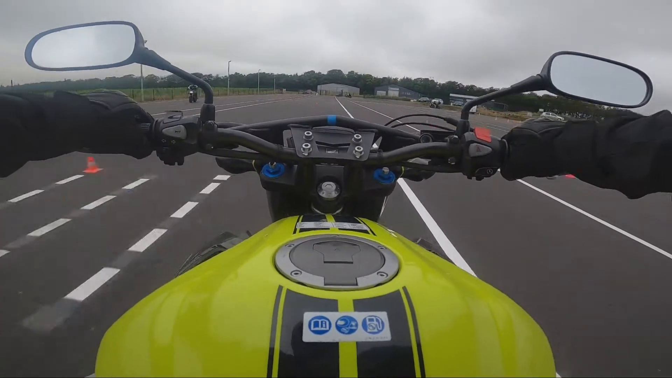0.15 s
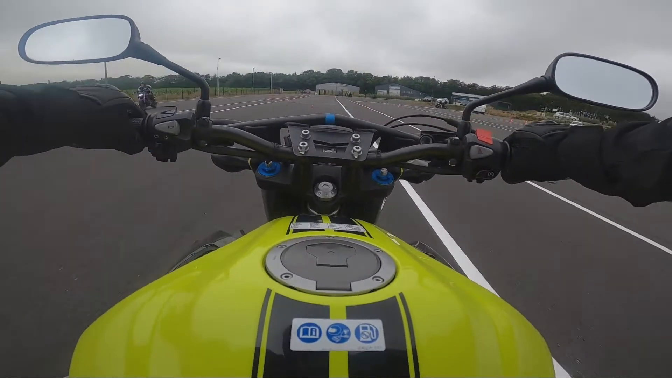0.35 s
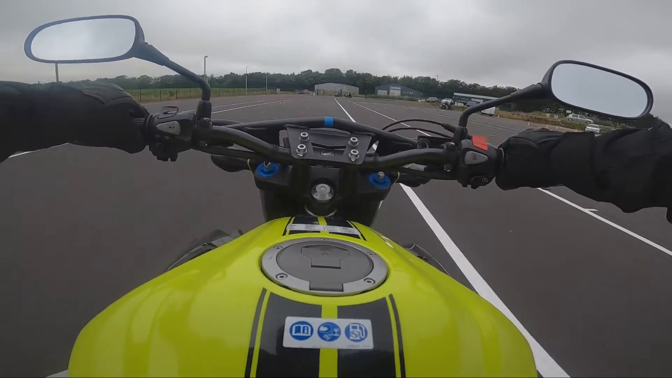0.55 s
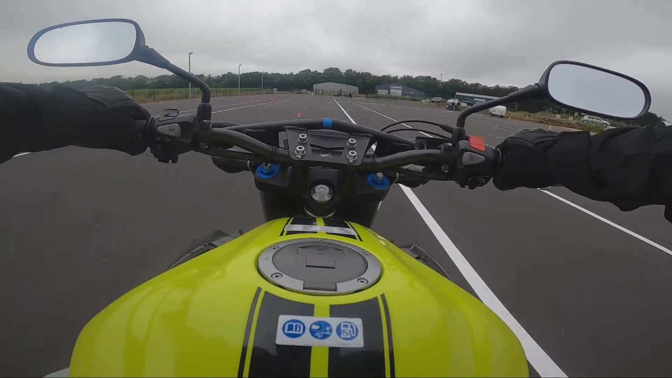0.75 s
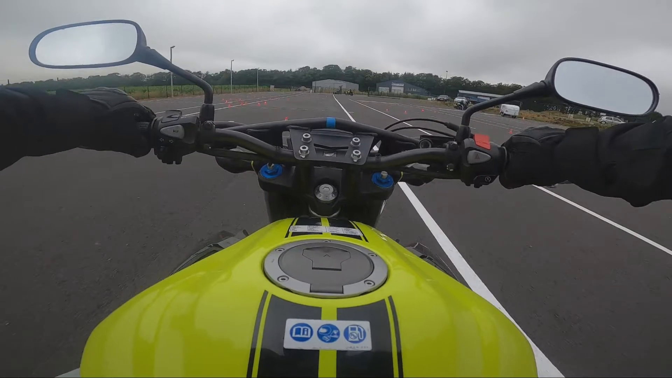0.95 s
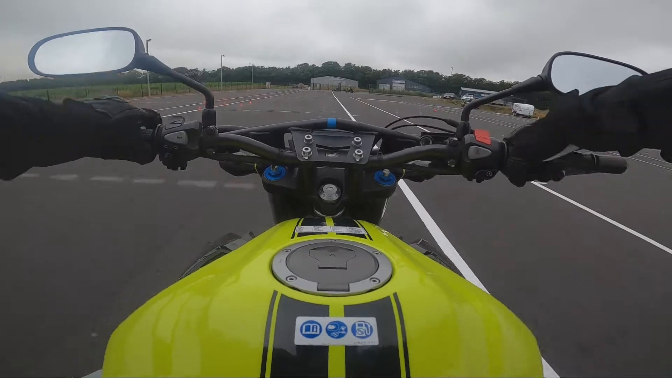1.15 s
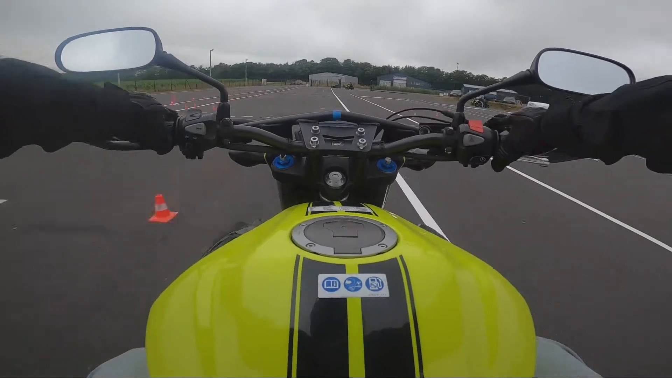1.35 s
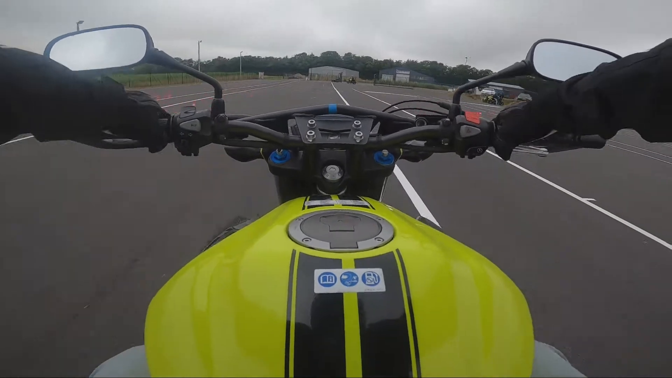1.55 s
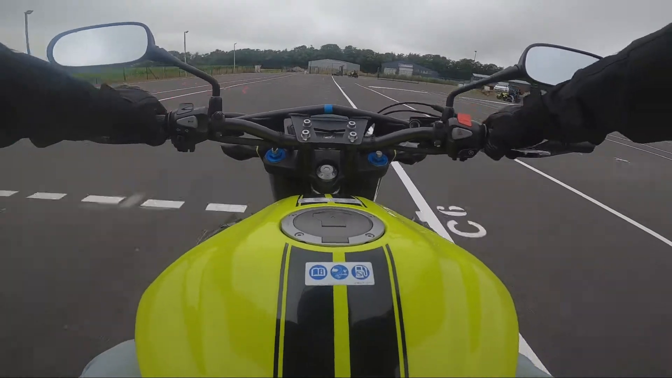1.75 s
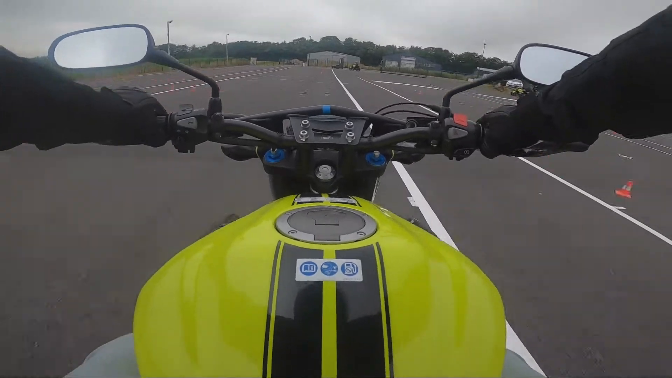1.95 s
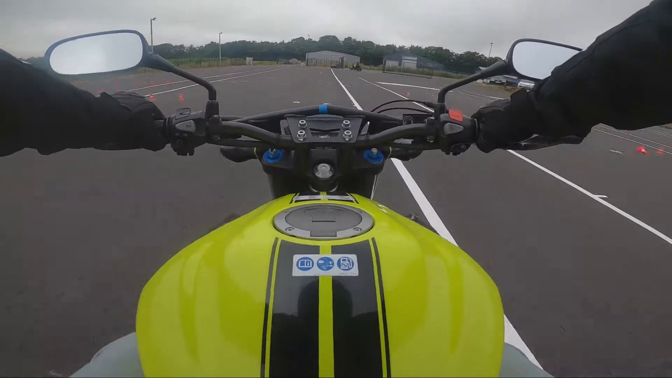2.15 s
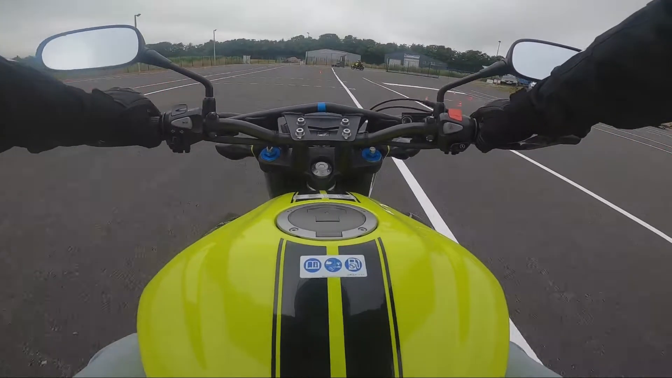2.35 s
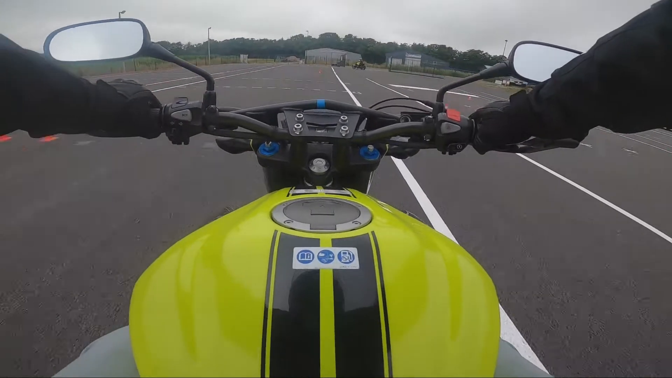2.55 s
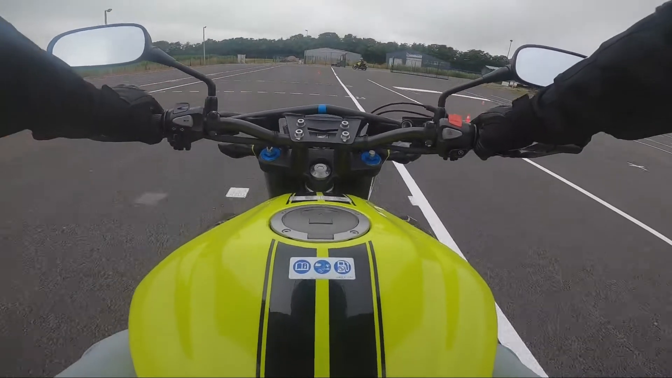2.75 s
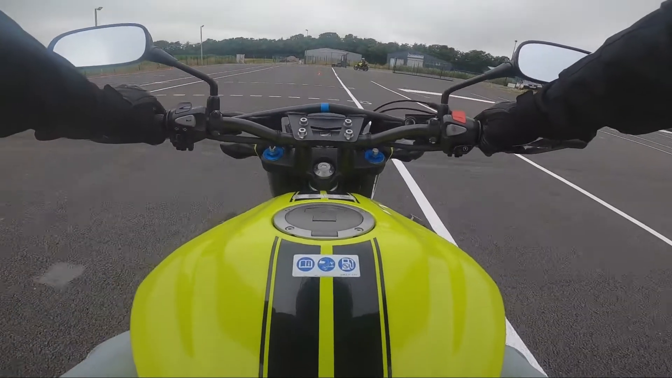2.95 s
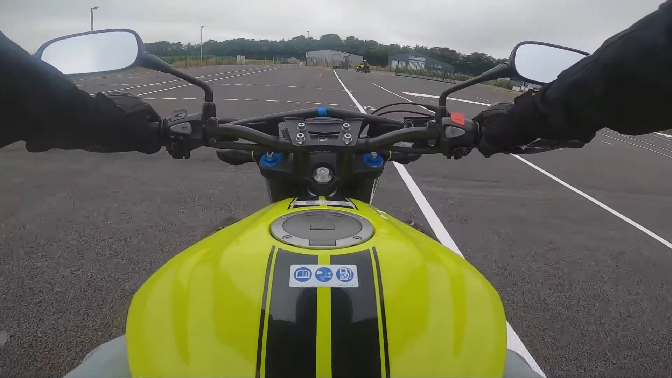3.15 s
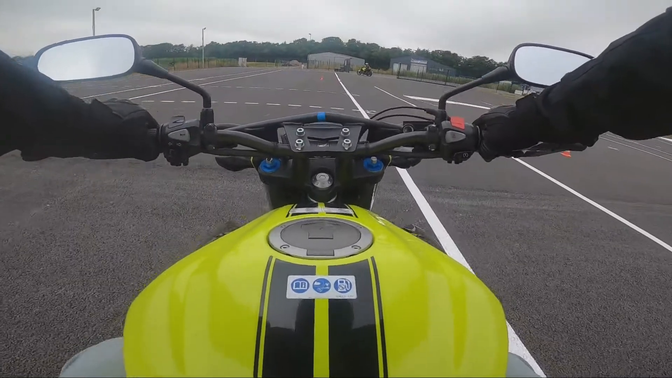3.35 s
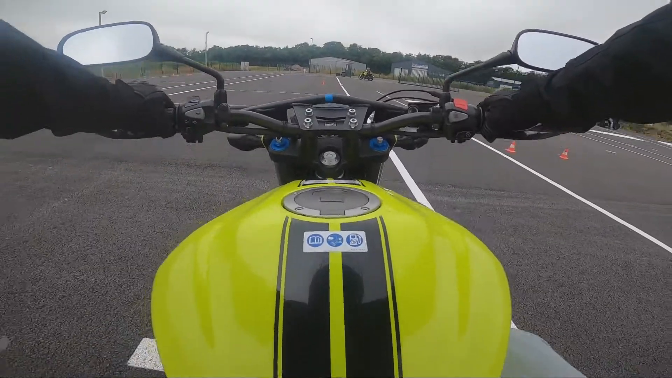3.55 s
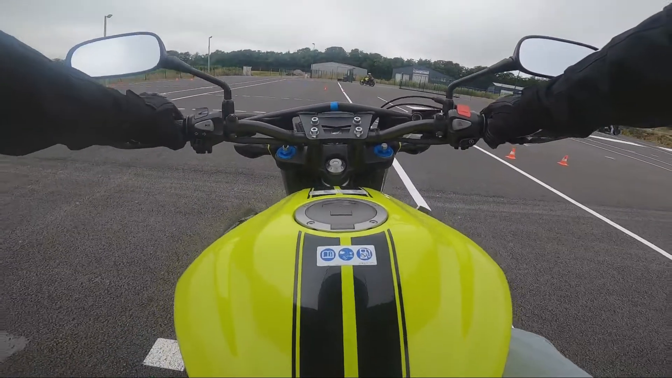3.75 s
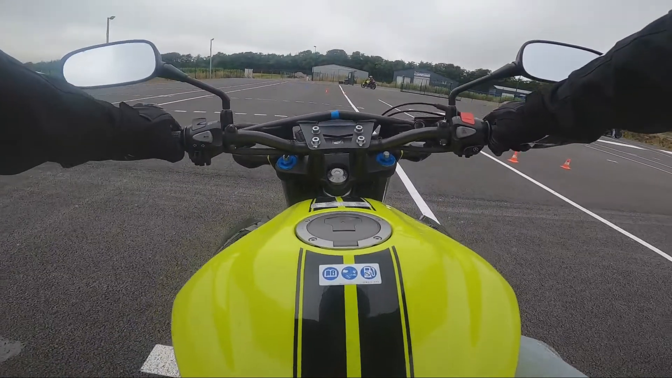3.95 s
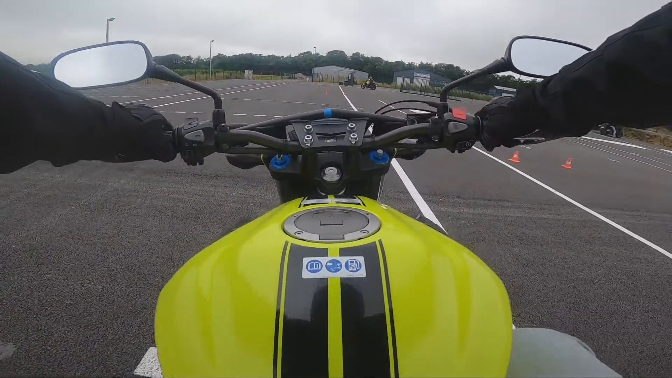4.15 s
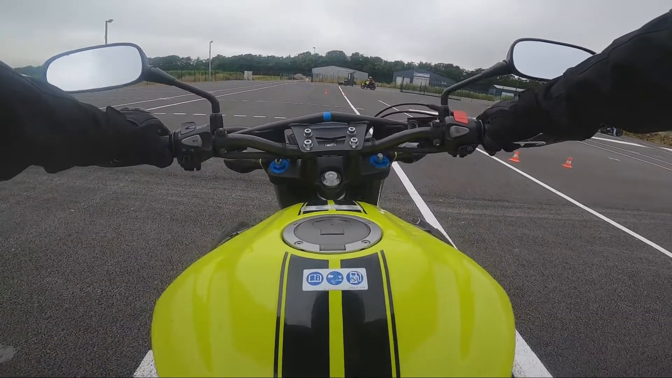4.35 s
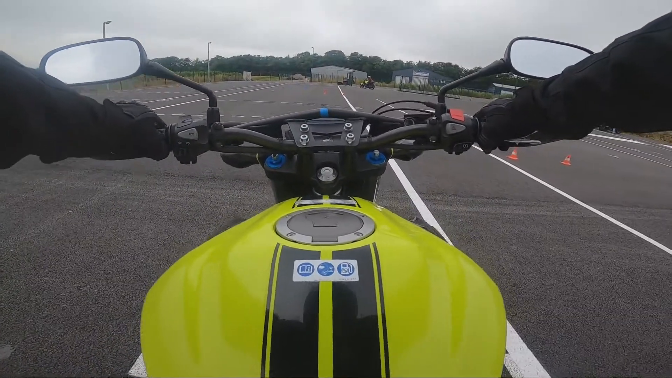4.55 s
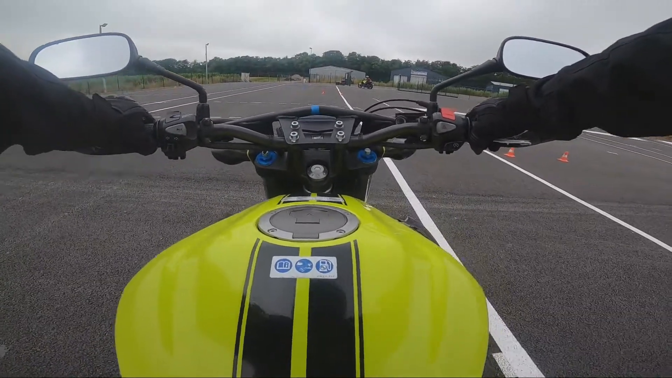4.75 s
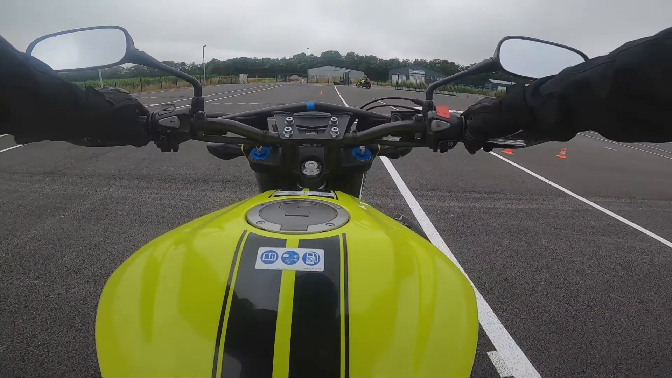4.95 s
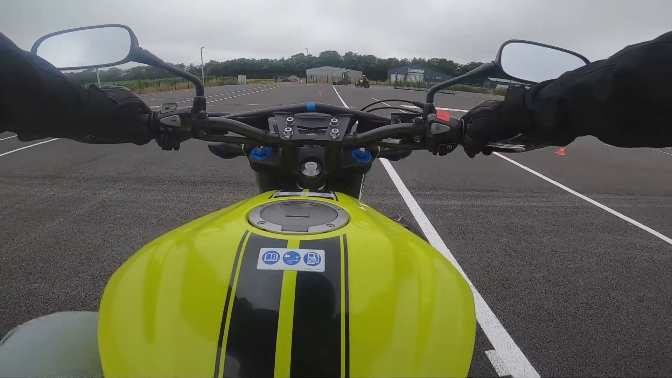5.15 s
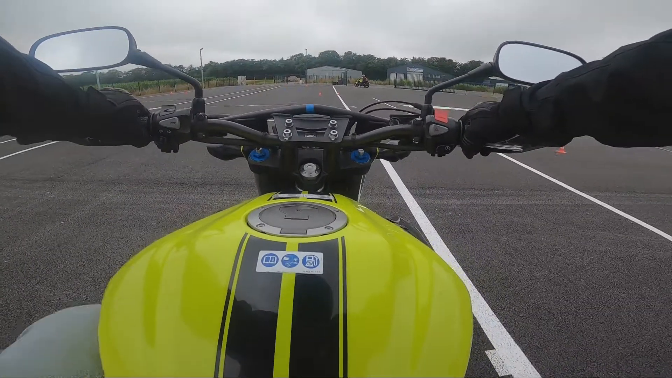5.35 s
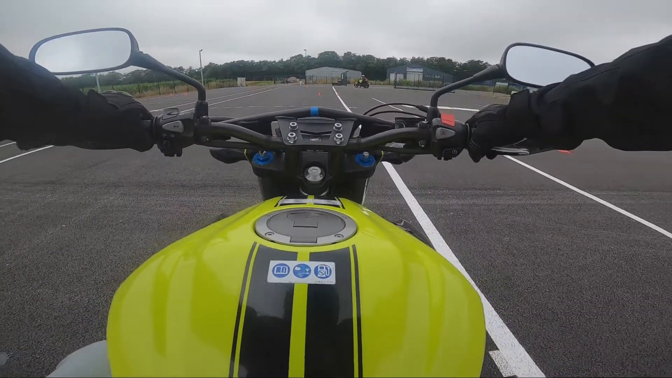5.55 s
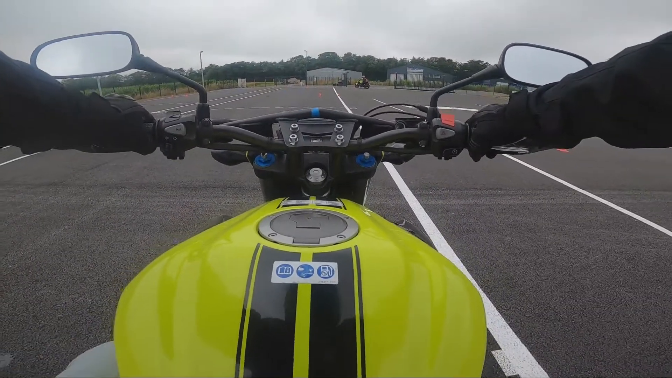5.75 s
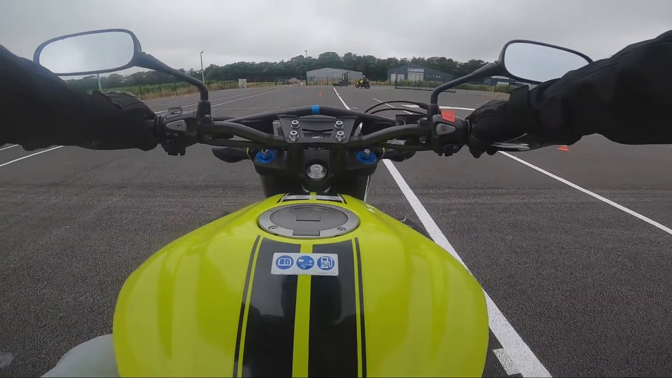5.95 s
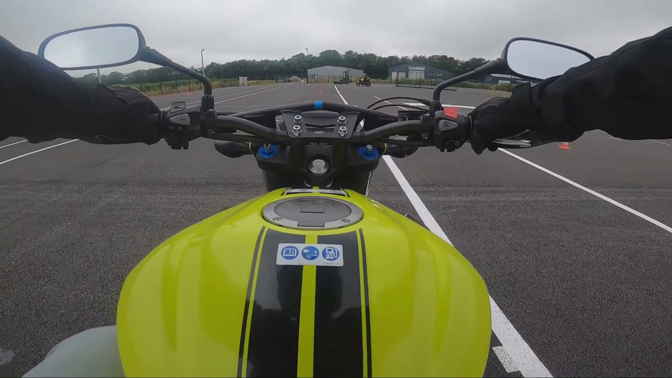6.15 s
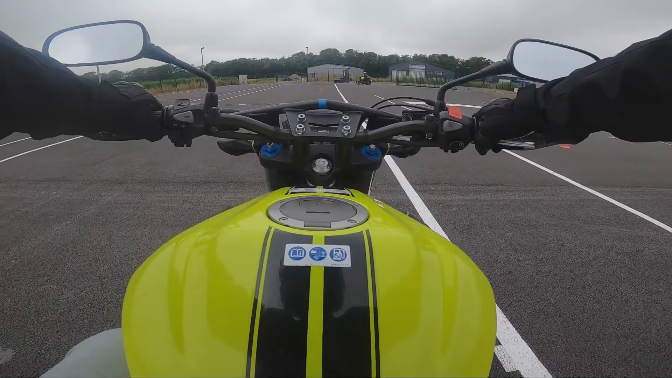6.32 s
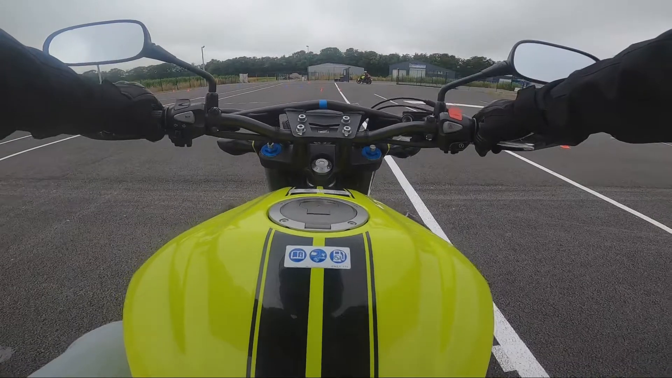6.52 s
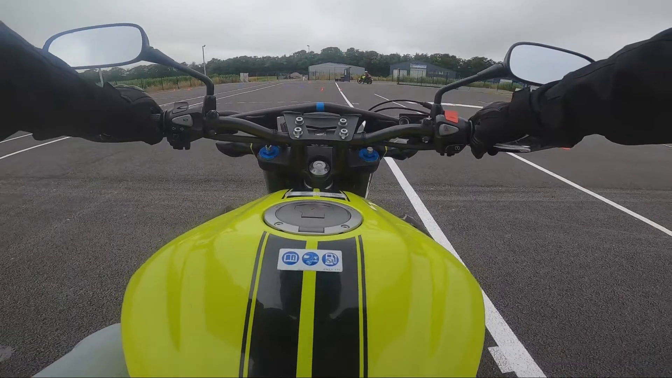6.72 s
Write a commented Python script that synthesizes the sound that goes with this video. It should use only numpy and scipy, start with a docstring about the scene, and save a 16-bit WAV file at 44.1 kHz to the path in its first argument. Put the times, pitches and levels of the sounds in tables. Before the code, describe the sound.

From 0 to 1.8 s a motorcycle coasts on asphalt: deep buffeting rumble, mid-range tyre roar and airy hiss, with thin chain whines sinking in pitch over a lumpy two-cylinder idle of roughly ten uneven paired beats a second. A sharp, hollow knock on the camera case lands at 1.9 s, with smaller bumps following. Road noise falls away from 2 s as loose gear ticks and jiggles; a rough whine around 1 kHz slides down near 2.5 s. At 2.9-3.5 s the brake judders low, easing then biting harder, and the frame rebounds in a few soft thuds near 3.7 s with a cloth rub. Stopped, the engine idles steadily in speed, quieter, then clattering more strongly from 4.7 s. A firm knock hits at 5.26 s; rattles, rustles and strap creaks continue, ending with a brighter tick at 6.7 s. Close and boxy throughout, in open air.

```python
"""An asphalt road: a two-cylinder motorcycle rolls to a stop, idling, heard by a small cased camera on the
rider. Paired firings ring three silencer resonances; block and valve noise, valve puffs and gear whines follow
the crank. Rumble, tyre roar and hiss are shaped noise that sinks with speed; the brake shudders and the frame
rebounds. The rider's gear knocks on the ringing case, and ticks, jiggles and rustles as bursts of noise."""
import sys
import numpy as np
from scipy import signal
from scipy.fft import rfft, irfft
from scipy.io import wavfile

SR = 44100
rng = np.random.default_rng(int(sys.argv[2]) if len(sys.argv) > 2 else 0)


def wrap_up_sound(samples):
    """Save the sound to the file named by the first command line argument, as 16-bit audio."""
    columns = np.atleast_2d(samples).T
    # keep every value between -1 and 1, then stretch to whole-number steps
    tamed = np.clip(columns, -1, 1)
    steps = np.round(tamed * 32767).astype(np.int16)
    wavfile.write(sys.argv[1], SR, steps)


N = 298998
TIME_S = np.arange(N) / SR
BIN_HZ = np.arange(N // 2 + 1) * SR / N + 1e-3

# Four-stroke rate coasting, braking, standing: (start [s], rate [cycles/s])
CYCLE_RATE = [(0, 10.194), (1.6, 9.74), (3.6, 10.068)]
FIRST_CYCLE = .13   # share of a cycle done at the start


def crank():
    """Crank position: cycles done at every sample."""
    start_s, rate = np.transpose(CYCLE_RATE)
    rate_now = rate[np.searchsorted(start_s, TIME_S, "right") - 1]
    return FIRST_CYCLE + np.cumsum(rate_now) / SR


# Cylinder firings: (place in cycle [share], level [dB])
FIRINGS = [(-.049, -3), (.195, 0)]


def firings(places, spread_db):
    """One click for each place in each cycle, of uneven strength."""
    cycles = crank()
    clicks = np.zeros(N)
    for place, db in places:
        at = np.flatnonzero(np.diff(np.floor(cycles - place)))
        clicks[at] = amp(db + spread_db * rng.standard_normal(len(at)))
    return clicks


# Engine effort: (time [s], level [dB])
EFFORT = [(0, -1.5), (1, -7), (2, -6), (3, -8.5), (4.2, -5), (4.7, -1), (5.2, -1.5), (5.8, -1), (6.3, 1),
          (6.78, -2.5)]
# Exhaust resonances: (frequency [Hz], width [Hz], level [dB], sign)
CHAMBERS = [(48.7, 31, 0, 1), (104, 34.5, .3, -1), (119, 15, -4, -1)]
PIPE_ECHO_S, PIPE_ECHO_DB = .0154, -5
EXHAUST_DB = -28.5   # at effort 0 dB


def exhaust(fired):
    """Each firing swells through three silencer resonances; the open pipe end sends an inverted echo."""
    echo = amp(PIPE_ECHO_DB) * np.roll(fired, round(PIPE_ECHO_S * SR))
    pipe = echo - fired
    chambers = 0
    for hz, width_hz, db, sign in CHAMBERS:
        chambers = chambers + sign * amp(db) * resonate(resonate(pipe, hz, width_hz), hz, width_hz)
    return amp(EXHAUST_DB + curve(EFFORT)) * rms_one(chambers)


# Block and valve noise spectrum: (frequency [Hz], density [dB per Hz])
CLATTER_COLOUR = [(210, -63.5), (350, -36.5), (457, -31.5), (657, -10), (944, -4.5), (1050, -6), (1390, -5),
                  (1590, -5.5), (1810, -18), (1970, -15), (2280, -26.5), (2400, -25), (3240, -21),
                  (4840, -25), (6310, -50), (8200, -57.5), (13900, -120)]
CLATTER_DB, CLATTER_FOLLOWS = -40, 1.26   # at effort 0 dB; dB per dB of effort


def clatter(fired, rise_s, steady):
    """Block and valve noise swells after each firing and ebbs in the long gap."""
    r = np.exp(-1 / (rise_s * SR))
    surge = rms_one(signal.lfilter([1], [1, -2 * r, r * r], fired))
    rough = (steady + surge) * noise(CLATTER_COLOUR, flicker_db=2.5, rate_hz=180)
    return amp(CLATTER_DB + CLATTER_FOLLOWS * curve(EFFORT)) * rms_one(rough)


# Valves seating: (place in cycle [share], level [dB])
VALVES = [(-.1, -7), (.05, 3), (.24, -1), (.47, -2.5)]
# Cylinder head rings: (frequency [Hz], width [Hz], level [dB])
HEAD = [(2480, 79, 6), (3260, 100, 1), (4130, 320, -4), (4800, 180, -7.5), (5360, 200, -10)]
VALVE_DB, VALVE_RISE_S = -60, .004   # at effort 0 dB


def valves():
    """Each seating valve sends a short puff of noise into the head's resonances."""
    r = np.exp(-1 / (VALVE_RISE_S * SR))
    shape = signal.lfilter([1], [1, -2 * r, r * r], firings(VALVES, spread_db=5.0))
    puffs = low_pass(8, 5600, shape * rng.standard_normal(N))
    head = sum(amp(db) * resonate(puffs, hz, width_hz) for hz, width_hz, db in HEAD)
    return amp(VALVE_DB + curve(EFFORT)) * rms_one(head)


# Gear meshes: (mean frequency [Hz], width [Hz], level [dB], swing in a cycle [dB], loudest place [share])
MESHES = [(1042, 36, -3.5, 6, 0.24), (1167, 47, -4.5, 5, 0.3), (1261, 55, -7, 2, 0.69),
          (1614, 50, -6.5, -1, 0.26), (1970, 60, -23, 1.5, 0.22), (3010, 46, -34.5, 6.5, 0.14),
          (4390, 55, -16.5, 7, .12)]
GEARS_DB, GEARS_FOLLOW = -43, 0.73   # at effort 0 dB; dB per dB of effort
GEAR_SWING, GEAR_LOW_AT = .028, .58   # share the crank speed swings in a cycle, place of its lowest


def gears():
    """All mesh pitches follow the uneven crank speed; each pair of teeth is loudest when it is loaded."""
    cycles = crank()
    speed = 1 - GEAR_SWING * np.cos(2 * np.pi * (cycles - GEAR_LOW_AT))
    lines = 0
    for hz, width_hz, db, swing_db, loudest in MESHES:
        loading = np.tanh(2 * np.cos(2 * np.pi * (cycles - loudest)))
        lines = lines + amp(db + swing_db * loading) * whistle(hz * speed, width_hz, steady=2.5)
    return amp(GEARS_DB + GEARS_FOLLOW * curve(EFFORT)) * lines


SHUDDER_FROM_S, SHUDDER_TO_S, SHUDDER_RISE_S, SHUDDER_FALL_S = 2.94, 3.48, 0.023, 0.013
SHUDDER_HZ, SHUDDER_LAST_HZ = 27.5, 31.5
GRAB_S, LAST_CREST_S = 3.2, 3.482   # harder grab and pitch climb begin; phase reference
SHUDDER_DB, SHUDDER_SAG_DB_PER_S, GRAB_DB_PER_S = -21.5, 12, 28.5


def shudder(second_db):
    """The brake grabs and lets go, shaking the whole frame: it eases, then bites harder until the wheel stops."""
    hz = np.interp(TIME_S, [GRAB_S, SHUDDER_TO_S], [SHUDDER_HZ, SHUDDER_LAST_HZ])
    db = SHUDDER_DB - SHUDDER_SAG_DB_PER_S * np.clip(TIME_S - SHUDDER_FROM_S, 0, GRAB_S - SHUDDER_FROM_S)
    db += GRAB_DB_PER_S * np.clip(TIME_S - GRAB_S, 0, SHUDDER_TO_S - GRAB_S)
    phase = 2 * np.pi * np.cumsum(hz) / SR
    phase += np.pi / 2 - phase[round(LAST_CREST_S * SR)]
    shape = swell(SHUDDER_FROM_S, SHUDDER_TO_S - SHUDDER_FROM_S, SHUDDER_RISE_S, SHUDDER_FALL_S)
    shake = np.sin(phase) + amp(second_db) * np.sin(2 * phase)
    return np.sqrt(2) * amp(db) * shape * shake


REBOUND_S, REBOUND_HZ = 3.668, 20   # highest crest, pitch
REBOUND_DB, REBOUND_RISE_S, REBOUND_FALL_S = -15, .04, 0.058


def rebound():
    """The frame bounces a few times on its springs once the wheel has stopped."""
    shape = swell(REBOUND_S, 0, REBOUND_RISE_S, REBOUND_FALL_S)
    return amp(REBOUND_DB) * shape * np.cos(2 * np.pi * REBOUND_HZ * (TIME_S - REBOUND_S))


WHINE_S, WHINE_HZ, WHINE_SINK_HZ_PER_S = 2.52, 1150, 1400   # start of the hold, pitch there
WHINE_FLOOR_HZ = 985   # the pitch levels off here
WHINE_DB, WHINE_RISE_S, WHINE_HOLD_S, WHINE_FALL_S = -38, 0.12, 0.13, 0.1


def whine():
    """A rough falling whine as the wheels slow, in three strands."""
    over_hz = WHINE_HZ - WHINE_FLOOR_HZ - WHINE_SINK_HZ_PER_S * (TIME_S - WHINE_S)
    hz = WHINE_FLOOR_HZ + 40 * np.logaddexp(0, over_hz / 40)   # rounded corner
    strands = whistle(hz, 90, steady=.8)
    strands = strands + amp(-6) * whistle(1.11 * hz, 80, steady=.5)
    strands = strands + amp(-14) * whistle(1.3 * hz, 70)
    return amp(WHINE_DB) * swell(WHINE_S, WHINE_HOLD_S, WHINE_RISE_S, WHINE_FALL_S) * strands


# Blows: (time [s], body [dB], rap [dB], thump [dB], crack [dB], signed strength: push in +, pull -)
KNOCKS = [(1.759, -17, -30.5, -15, -58, 1), (1.92, 0, -4, -11.5, -23, 0.85),
          (1.975, -16, -10, -28.5, -55, 0.29), (2.056, -9.5, -30, -27, -51, 0.98),
          (2.886, -25, -25, -21, -46, 1), (3.037, -15, -20.5, -18, -53, 0.89),
          (3.155, -17.5, -32, -29, -58, 0.95), (3.597, -27, -20.5, -29, -55, 0.97),
          (3.643, -29, -36, -18, -62, -1.1), (3.7062, -22, -29, -27.5, -55, 0.54),
          (3.7635, -36, -36, -16, -59, 1), (3.941, -21, -25, -24, -60.5, 0.33),
          (4.691, -17, -35, -16.5, -61, -0.9), (4.733, -38, -49.5, -18.5, -52, -1.1),
          (4.835, -17.5, -30, -36, -58, 0.94), (4.875, -22.5, -26, -18, -58, -1.2),
          (5.2592, -9.5, -5, -13, -62, 0.83), (5.559, -24, -29, -15.5, -58, 0.83),
          (5.902, -19, -15, -15.5, -51, 0.91), (5.969, -39, -34, -13, -56, 1)]
# Case modes: (frequency [Hz], level [dB], t60 [s], delay [s], signed gain)
CASE_MODES = [(114, 11.5, 0.017, 0.0036, 1), (241, -1, 0.0086, 0.0024, 0.76),
              (610, -3, 0.0056, 0.0022, -0.87), (1190, -3, 0.014, 0.0022, 0.36),
              (1590, -8.5, 0.0048, 0.0022, 0.59), (1820, 6, 0.0045, 0.0018, -0.81),
              (2300, 10.5, 0.0072, 0.0022, 1), (3300, -4.5, 0.017, 0.0058, -1.3)]


def knocks():
    """Blows on the case: the lowest mode is the thump, then come body and rap, the highest the crack."""
    s, body_db, rap_db, thump_db, crack_db, push = np.transpose(KNOCKS)
    out = np.zeros(N)
    for hz, mode_db, t60_s, delay_s, sign in CASE_MODES:
        level_db = thump_db if hz < 180 else body_db if hz < 800 else rap_db if hz < 1700 else crack_db
        clicks = np.zeros(N)
        clicks[((s + delay_s) * SR).astype(int)] = amp(mode_db + level_db) * sign * push
        contact = low_pass(4, 1.3 * hz, clicks + 1e-18)   # the contact takes time
        r, w = amp(-60 / (t60_s * SR)), 2 * np.pi * hz / SR
        out += signal.lfilter([0, np.sin(w)], [1, -2 * r * np.cos(w), r * r], contact)
    return low_pass(6, 4200, out)


# Loose gear jiggling: (start [s], end [s], level [dB])
JIGGLES = [(2.15, 3.488, -54), (5.95, 6.68, -52.5)]
JIGGLES_PER_S, JIGGLE_T60_S = 22, .14   # mean rate


def jiggle():
    """Envelope of many small uneven rattles at random moments."""
    level = sum(amp(db) * swell(s, to_s - s, .05, .05) for s, to_s, db in JIGGLES)
    clicks = (rng.random(N) < JIGGLES_PER_S / SR) * amp(4 * rng.standard_normal(N))
    return level * signal.lfilter([1], [1, -amp(-60 / (JIGGLE_T60_S * SR))], clicks + 1e-18)


# Gear ticks: (time [s], rattle peak [dB], spray over rattle [dB], t60 [s])
TICKS = [(2.186, -41.5, -18, 0.1), (2.3201, -44.5, -22, 0.096), (2.382, -41, -21, 0.07),
         (2.6753, -54.5, -23, 0.091), (2.98, -45, -30, 0.17), (3.077, -49.5, -27, 0.1),
         (3.42, -52.5, -24, 0.14), (3.662, -44.5, -12, 0.11), (4.835, -51, -21, 0.11),
         (5.378, -37.5, -21, 0.058), (5.513, -44, -14, 0.087), (5.7882, -39.5, -13, 0.084),
         (5.8085, -44.5, -12, 0.18), (6.095, -40, -12, .08), (6.44, -39.5, -13, 0.066),
         (6.479, -45, -18, .08), (6.721, -31.5, -14, 0.083), (6.77, -41, -12, 0.16)]
TICK_RISE_S = 0.008


def ticks():
    """Loose gear rattles near 3 kHz: decaying noise bursts with a bright spray, over the jiggling."""
    rattle, spray = jiggle(), np.zeros(N)
    for s, db, spray_db, t60_s in TICKS:
        near = slice(int((s - TICK_RISE_S) * SR), int((s + t60_s) * SR))
        after_s = TIME_S[near] - s
        shape = amp(db - 60 * np.abs(after_s) / t60_s) * np.clip(1 + after_s / TICK_RISE_S, 0, 1)
        rattle[near] += shape
        spray[near] += amp(spray_db) * shape
    ring = noise([(1500, -2.5), (2700, -10.0), (3300, 1.0), (3900, -6), (4500, -10.0), (5500, -20.0)],
                 flicker_db=2.0, rate_hz=200)
    bright = noise([(4500, -4.0), (5200, -2.5), (6500, -11.0), (8000, -22.0), (11000, -35.5), (15000, -32.5)],
                   flicker_db=4.5, rate_hz=150)
    return rattle * ring + spray * bright


# Rubs: (time [s], hold [s], cloth [dB], strap creak [dB])
RUSTLES = [(3.656, 0.02, -35.5, -65), (3.72, 0.0074, -45, -59), (3.815, 0.018, -47, -60.5),
           (5.023, 0.041, -40.5, -50), (6.1, 0.25, -46, -51.5), (6.17, 0.011, -53, -51),
           (6.44, 0.16, -46, -54), (6.5, 0.055, -69, -51)]
# Cloth spectrum: (frequency [Hz], density [dB per Hz])
CLOTH_COLOUR = [(400, -1), (700, 8), (1200, 3.5), (2000, -5.5), (2700, -6), (3300, -1), (4000, -13.5),
                (5000, -9), (6300, -30.5), (8000, -38.5), (11000, -51), (15000, -61)]
RUSTLE_RISE_S, RUSTLE_FALL_S = 0.05, 0.011


def rustles():
    """Cloth and strap rub: longer grainy swells of two coloured noises."""
    cloth, creak = np.zeros((2, N))
    for s, hold_s, cloth_db, creak_db in RUSTLES:
        shape = swell(s, hold_s, RUSTLE_RISE_S, RUSTLE_FALL_S)
        cloth += amp(cloth_db) * shape
        creak += amp(creak_db) * shape
    strap = noise([(1700, -17.0), (2050, 0.5), (2300, -17.0), (2600, -4)], flicker_db=1.0, rate_hz=48)
    return cloth * noise(CLOTH_COLOUR, flicker_db=2.0, rate_hz=44) + creak * strap


# Rolling noise: (time [s], level [dB])
ROLL = [(0, 1), (.8, 0.5), (1.4, 0.57), (1.8, -0.5), (2.0, -3.5), (2.3, -6.5), (2.6, -8.5), (3.3, -12.5),
        (4.1, -16), (4.9, -13.5), (5.8, -13), (6.2, -14), (6.78, -12)]
# The rider's body lurches: (time [s], rumble [dB], deep sway [dB])
JOLTS = [(1.985, -25.5, -21.5), (2.301, -38.5, -14.5), (3.036, -34, -18.5), (3.23, -55, -28.5),
         (3.678, -27.5, -24.5), (3.95, -37, -35), (4.572, -36.5, -36.5), (5.36, -34.5, -41),
         (5.55, -31, -32.5), (6.119, -36, -42), (6.628, -48.5, -53)]
# Rumble spectrum: (frequency [Hz], density [dB per Hz])
RUMBLE_COLOUR = [(12, -25), (20, 2), (38, 2.5), (70, -3), (112, 1), (203, -14), (307, -18), (381, -30),
                 (492, -29), (600, -25.5), (780, -57), (1320, -120)]
JOLT_RISE_S, JOLT_FALL_S = 0.072, 0.07
RUMBLE_DB, SWAY_DB = -18, -30.5   # at 0 dB of rolling noise
RUMBLE_FOLLOWS, SWAY_FOLLOWS = 1.116, 0.24   # dB per dB of rolling noise


def buffeting():
    """Rumble and deep sway come through the rider's body, sinking with speed and swelling at each lurch."""
    roll_db = curve(ROLL)
    rumble = amp(RUMBLE_DB + RUMBLE_FOLLOWS * roll_db)
    sway = amp(SWAY_DB + SWAY_FOLLOWS * roll_db)
    for s, rumble_db, sway_db in JOLTS:
        shape = swell(s, 0, JOLT_RISE_S, JOLT_FALL_S)
        rumble += amp(rumble_db) * shape
        sway += amp(sway_db) * shape
    deep = noise([(7, -21.0), (12, -4.5), (24, -19.5)], flicker_db=1.5, rate_hz=2.6)
    return rumble * noise(RUMBLE_COLOUR, flicker_db=.4, rate_hz=26) + sway * deep


# Tyre roar spectrum: (frequency [Hz], density [dB per Hz])
ROAR_COLOUR = [(210, -7), (350, -1.5), (483, -9), (678, -2.5), (822, -7), (989, 3.5), (1200, 0), (1330, -4),
               (1620, -7.5), (1860, -13.5), (1960, -13), (2120, -23.5), (2200, -14), (2860, -40.5),
               (4840, -120)]
# Wavering tones in the roar: (mean frequency [Hz], width [Hz], level over roar [dB])
STRANDS = [(973, 70, -17.5), (1187, 47, -9), (1586, 110, -16.5)]
ROAR_DB, ROAR_FOLLOWS = -29, 1.25   # at 0 dB of rolling noise; dB per dB of it
STRAND_WANDER, STRAND_FOLLOWS = .035, .8   # share of pitch; extra dB per dB of rolling noise


def tyre_roar():
    """Tyre noise on the asphalt, with wavering tones that fade faster than the roar."""
    roll_db = curve(ROLL)
    roar = noise(ROAR_COLOUR, flicker_db=1.0, rate_hz=24)
    for hz, width_hz, db in STRANDS:
        level = amp(db + STRAND_FOLLOWS * roll_db + 0.84 * drift(13.0))
        roar = roar + level * whistle(hz * (1 + STRAND_WANDER * drift(3)), width_hz)
    return amp(ROAR_DB + ROAR_FOLLOWS * roll_db) * roar


# Hiss spectrum: (frequency [Hz], density [dB per Hz])
HISS_COLOUR = [(1180, -22), (2000, -2), (2130, -4.5), (2380, 1.5), (2620, -3), (2900, 2), (3410, 1),
               (3740, -4.5), (4170, 0.5), (4440, -11), (4730, 0), (5230, -7), (6310, -20), (8200, -50.5),
               (13900, -120)]
# Thin top of air: (frequency [Hz], density [dB per Hz])
AIR_COLOUR = [(5000, -16), (6500, -2.2), (7500, -4), (8500, -22), (10000, -15.5), (12000, -26.5),
              (13500, -26), (15500, -39)]
# Chain whines: (frequency at time 0 [Hz], width [Hz], level over hiss [dB], start [s], end [s])
CHAIN = [(3070, 70, -8, .3, 1.15), (3390, 110, -10, 0, .15), (4960, 45, -14, 0, 1.5),
         (3210, 40, -16, .85, 1.25)]
HISS_DB, HISS_FOLLOWS = -41, 1   # at 0 dB of rolling noise; dB per dB of it
CHAIN_SINK, CHAIN_FADE_S = .075, .15   # share of pitch lost a second; fade in and out


def hiss():
    """Hiss and air sink with speed, over faint chain whines that drop in pitch as the wheels slow."""
    out = noise(HISS_COLOUR, flicker_db=1.0, rate_hz=15)
    out += amp(-24) * noise(AIR_COLOUR, flicker_db=0.5, rate_hz=30)
    sink = np.exp(-CHAIN_SINK * TIME_S)
    for hz, width_hz, db, s, to_s in CHAIN:
        shape = swell(s, to_s - s, CHAIN_FADE_S, CHAIN_FADE_S)
        out += amp(db) * shape * whistle(hz * sink, width_hz, steady=1.2)
    return amp(HISS_DB + HISS_FOLLOWS * curve(ROLL)) * out


def amp(db):
    """dB to gain."""
    return 10 ** (np.asarray(db) / 20)


def rms_one(x):
    """Scale to rms 1."""
    return x / np.sqrt(np.mean(x ** 2) + 1e-20)


def curve(rows):
    """A (time, level) table at every sample."""
    s, level = np.transpose(rows)
    return np.interp(TIME_S, s, level)


def at_hz(points):
    """A spectrum table at every FFT bin, on a log frequency axis."""
    hz, value = np.transpose(points)
    return np.interp(np.log(BIN_HZ), np.log(hz), value)


def low_pass(order, cutoff_hz, x):
    """Butterworth low-pass."""
    return signal.sosfilt(signal.butter(order, cutoff_hz, fs=SR, output="sos"), x)


def drift(rate_hz):
    """Slow random wander of spread 1: low-passed noise made at SR / 40."""
    r = np.exp(-80 * np.pi * rate_hz / SR)
    raw = rng.standard_normal(N // 40 + 2002)
    slow = signal.lfilter([1], [1, -2 * r, r * r], raw)[2000:]   # past the start-up
    return np.interp(np.arange(N) / 40, np.arange(len(slow)), rms_one(slow))


def swell(s, hold_s, rise_s, fall_s):
    """Envelope of height 1: a rounded rise up to s, a hold, a rounded fall."""
    out = np.zeros(N)
    first = max(int((s - 4 * rise_s) * SR), 0)
    last = min(int((s + hold_s + 4 * fall_s) * SR), N)
    t = np.arange(first, last) / SR
    rise = np.minimum(t - s, 0) / rise_s
    fall = np.maximum(t - s - hold_s, 0) / fall_s
    out[first:last] = np.exp(-rise ** 2 - fall ** 2)
    return out


def resonate(x, hz, width_hz):
    """Two-pole resonance with gain 1 on top."""
    r = np.exp(-np.pi * width_hz / SR)
    poles = [1, -2 * r * np.cos(2 * np.pi * hz / SR), r * r]
    return signal.lfilter([(1 - r * r) / 2, 0, (r * r - 1) / 2], poles, x + 1e-18)


def whistle(hz, width_hz, steady=0):
    """A blurred line: a narrow band of noise, with a steady part, carried along a pitch curve; rms 1."""
    band = signal.butter(4, width_hz / 2, fs=SR / 20, output="sos")
    slow = signal.sosfilt(band, rng.standard_normal((2, N // 20 + 2)))
    a, b = (np.interp(np.arange(N) / 20, np.arange(len(row)), row) for row in slow)
    phase = 2 * np.pi * np.cumsum(hz * np.ones(N)) / SR
    return rms_one((a + steady * a.std()) * np.sin(phase) + b * np.cos(phase))


# Left-right likeness: (frequency [Hz], correlation)
LIKENESS = [(20, 1), (250, 1), (600, 0.96), (1200, 0.98), (2200, 0.85), (4000, 0.5), (8000, 0.1)]


def noise(colour, flicker_db, rate_hz):
    """Coloured noise pair, alike in the bass and nearly unrelated in the top, with a flicker; rms 1."""
    a, b = rfft(rng.standard_normal((2, N)) * amp(flicker_db * drift(rate_hz)))
    alike = np.clip(at_hz(LIKENESS), 0, 1)
    inside = (BIN_HZ > colour[0][0]) & (BIN_HZ < colour[-1][0])
    pair = np.array([alike * a + np.sqrt(1 - alike ** 2) * b, a])
    return rms_one(irfft(pair * amp(at_hz(colour)) * inside, N))


# Air spaces of the case: (frequency [Hz], width [Hz], lift [dB])
CAVITY = [(1208, 160, 1), (2050, 250, -0.5), (2390, 190, 5), (3300, 20, -2.5), (3900, 45, -6),
          (5100, 100, -0.5), (5200, 72, 5.5), (5230, 110, 0.5)]
# Port balance: (frequency [Hz], left over right [dB])
PORT_DB = [(20, 3.5), (100, 1.5), (300, 1.8), (700, 4.5), (1200, 3), (2000, 1), (2600, 4.5), (3400, 9),
           (4600, 0), (6000, -13), (8000, 10), (12000, 0)]
# Port phase: (frequency [Hz], left lead [rad])
PORT_LEAD = [(0, 0), (400, -.15), (1380, .1), (1890, -.6), (2240, -2.3), (2760, -1.6), (3620, -.5),
             (4220, -4.6), (4480, -3.3), (4740, -3.5), (5250, -2.1), (6030, -2.9)]


def ports(pair):
    """The case's air spaces colour the sound; two ports split it by level and phase."""
    left, right = rfft(pair)
    cavity = amp(sum(db / (1 + (2 * (BIN_HZ - hz) / width_hz) ** 2) for hz, width_hz, db in CAVITY))
    lead_rad = np.interp(BIN_HZ, *np.transpose(PORT_LEAD))
    half = amp(at_hz(PORT_DB) / 2) * np.exp(.5j * lead_rad)   # half the difference on each side
    return irfft(cavity * np.array([left * half, right / half]), N)


EDGE_S = .004   # fade in and out


def scene():
    """Engine, brake, gear and road noise together, through the case to its two ports."""
    fired = firings(FIRINGS, spread_db=2.5)
    engine = exhaust(fired) + valves() + gears()
    central = engine + shudder(second_db=-17.5) + rebound() + whine() + knocks()
    wide = clatter(fired, rise_s=0.0072, steady=3.3) + ticks() + rustles()
    road = buffeting() + tyre_roar() + hiss()
    edges = signal.windows.tukey(N, 2 * EDGE_S * SR / N)
    return ports(edges * (central + wide + road))


STOPBAND_HZ, STOPBAND_DB = 15000, 70


def record(dry):
    """Steep low-pass: the top is cut."""
    return signal.sosfilt(signal.cheby2(12, STOPBAND_DB, STOPBAND_HZ, fs=SR, output="sos"), dry)


dry = scene()
out = record(dry)
wrap_up_sound(out)
```